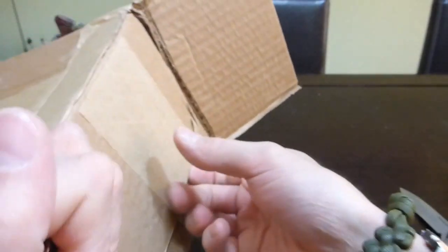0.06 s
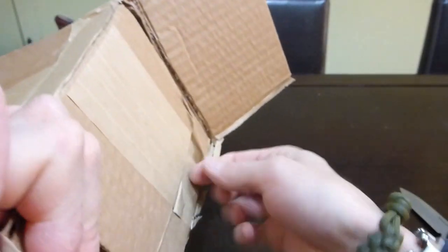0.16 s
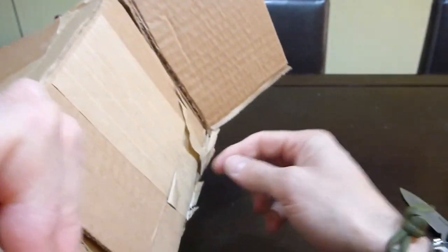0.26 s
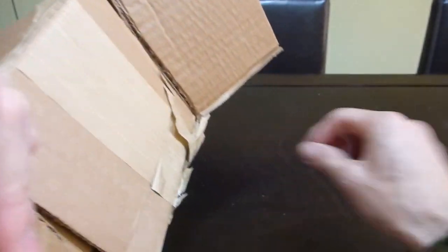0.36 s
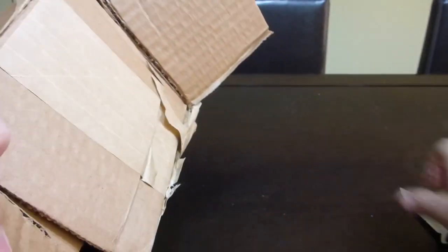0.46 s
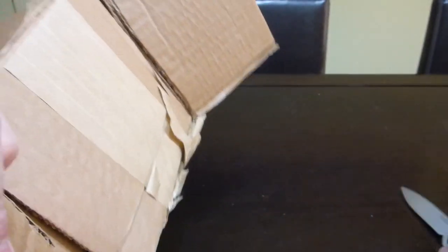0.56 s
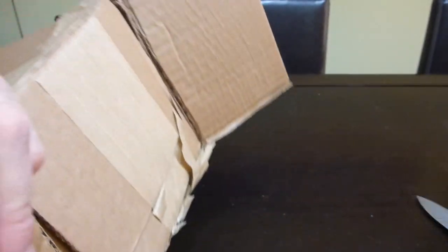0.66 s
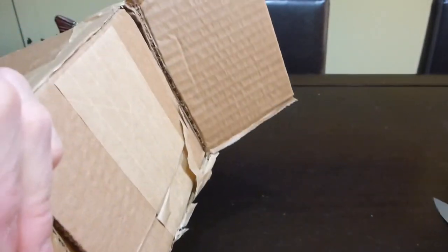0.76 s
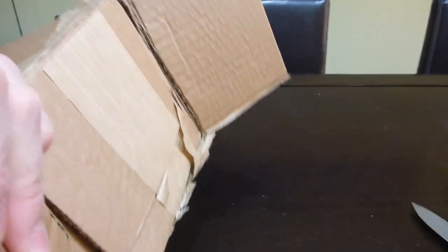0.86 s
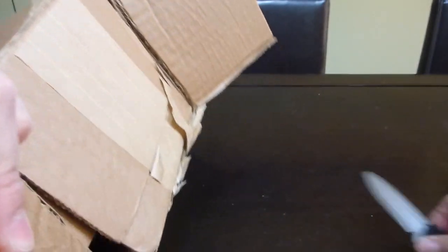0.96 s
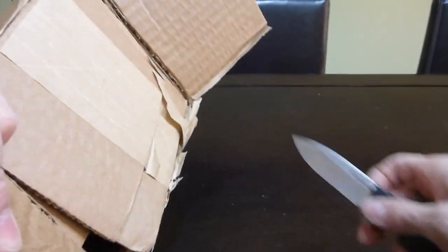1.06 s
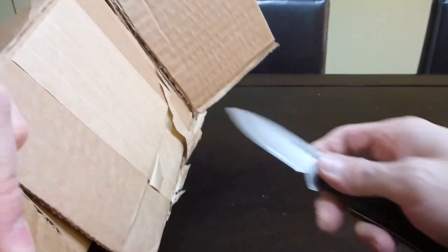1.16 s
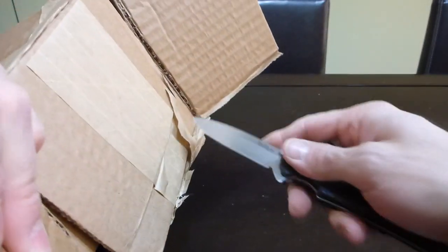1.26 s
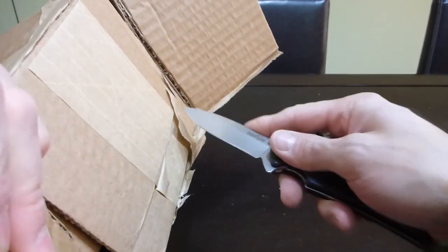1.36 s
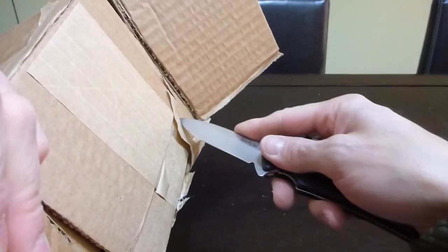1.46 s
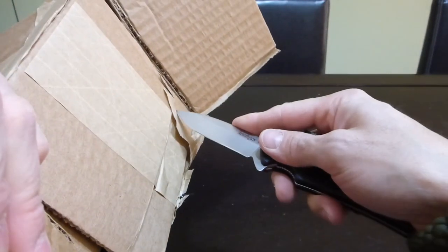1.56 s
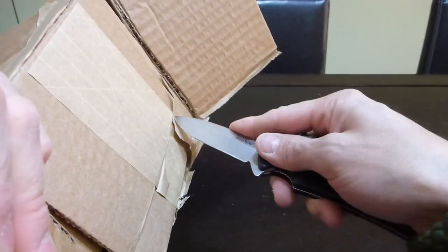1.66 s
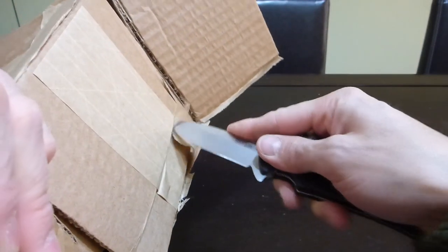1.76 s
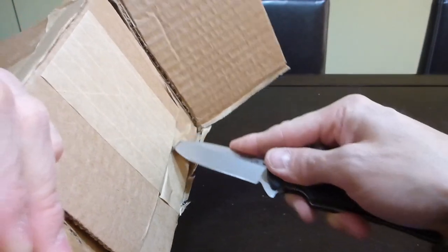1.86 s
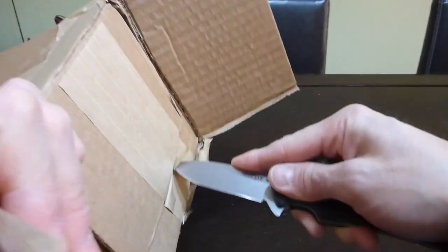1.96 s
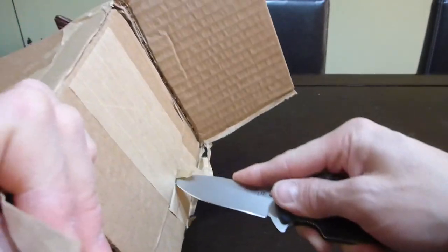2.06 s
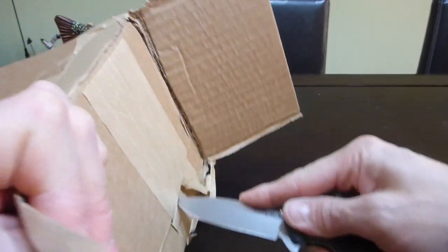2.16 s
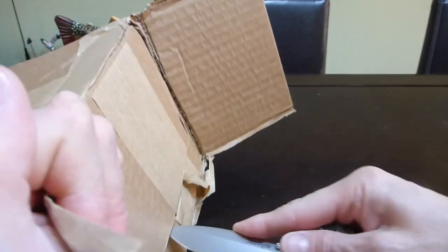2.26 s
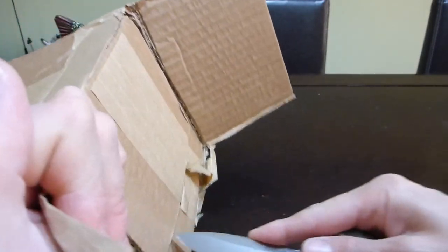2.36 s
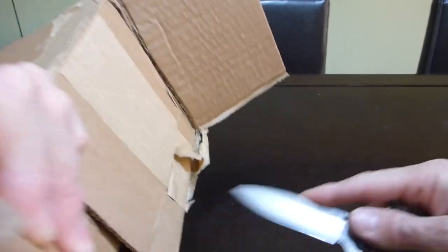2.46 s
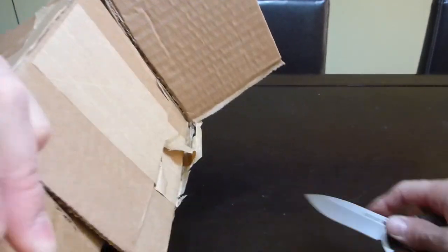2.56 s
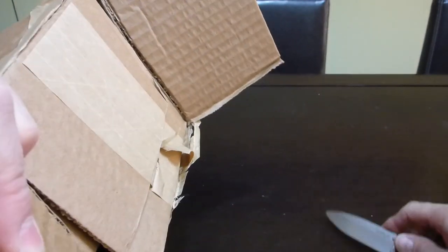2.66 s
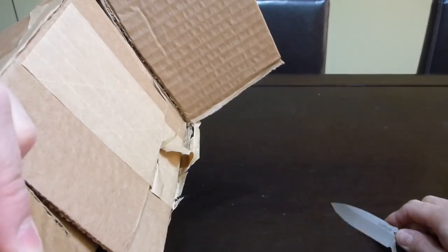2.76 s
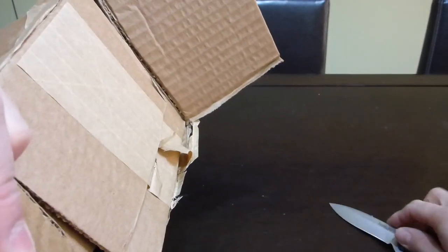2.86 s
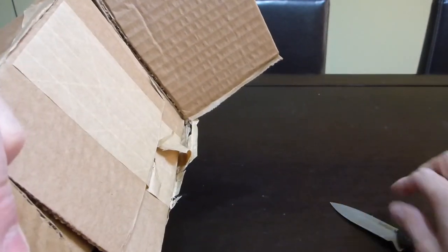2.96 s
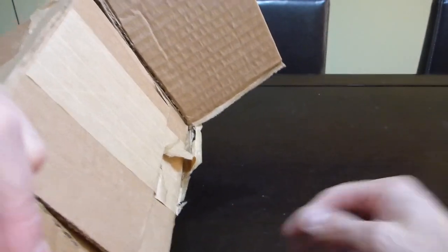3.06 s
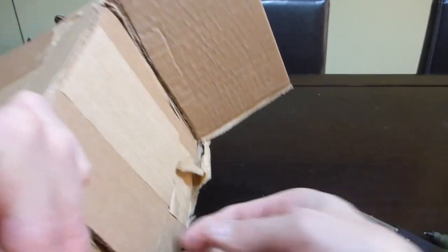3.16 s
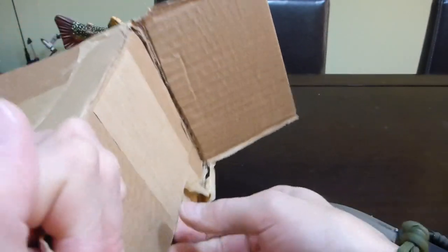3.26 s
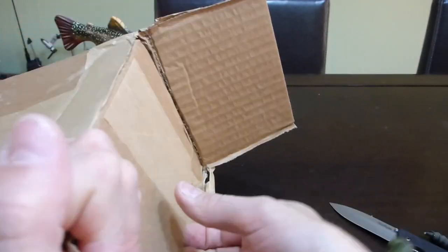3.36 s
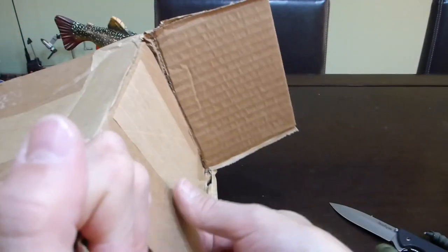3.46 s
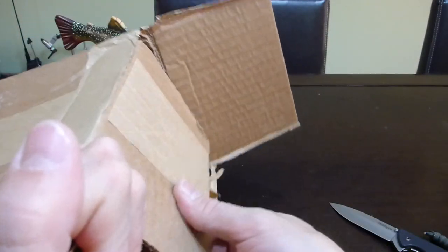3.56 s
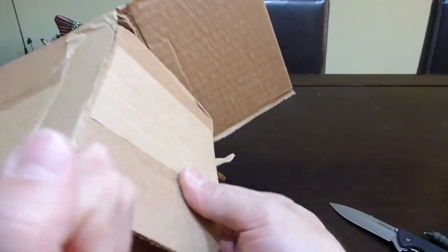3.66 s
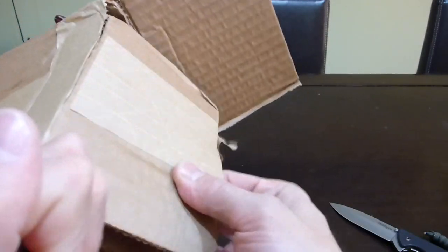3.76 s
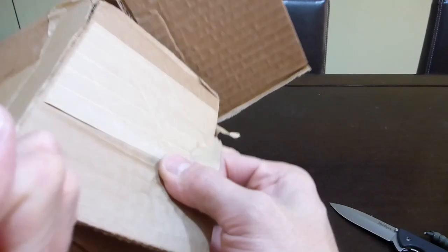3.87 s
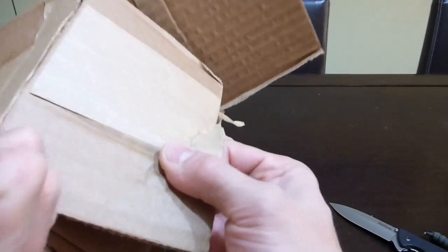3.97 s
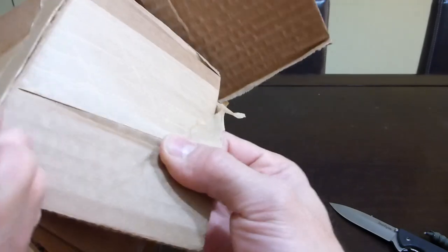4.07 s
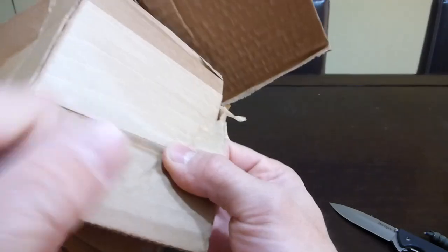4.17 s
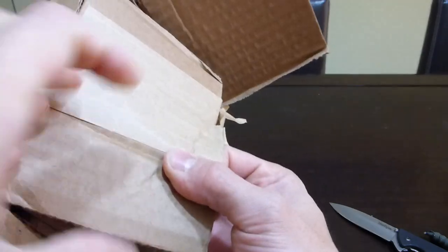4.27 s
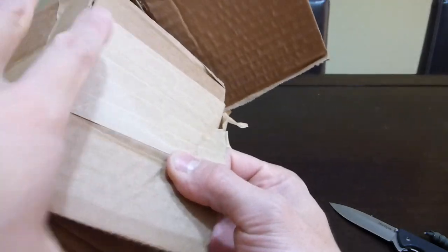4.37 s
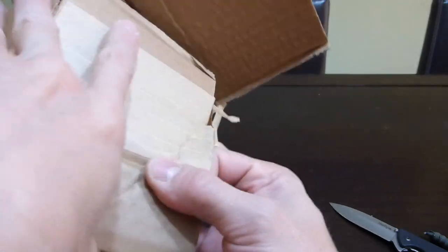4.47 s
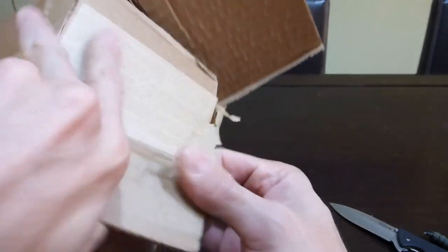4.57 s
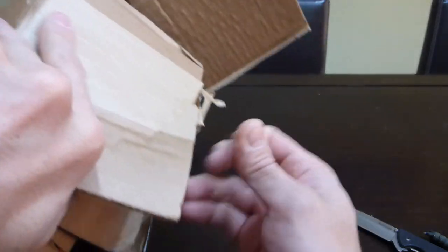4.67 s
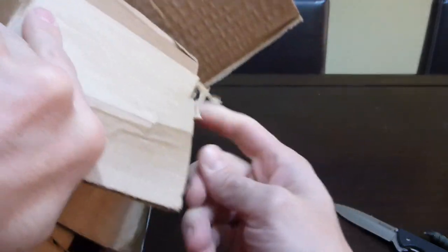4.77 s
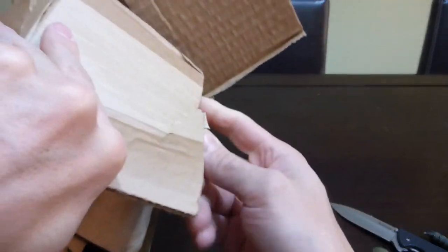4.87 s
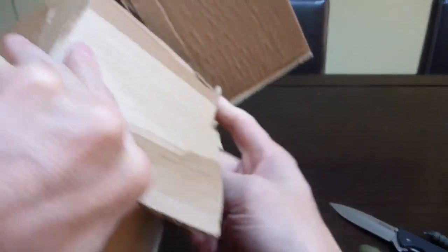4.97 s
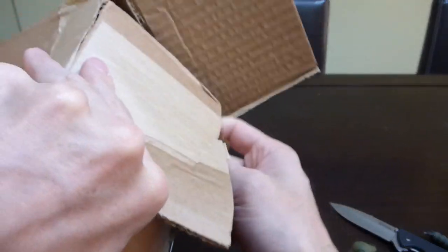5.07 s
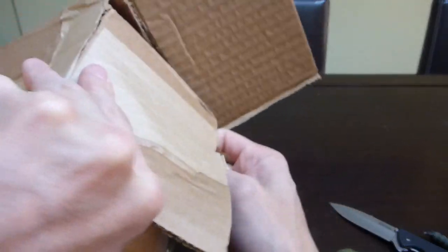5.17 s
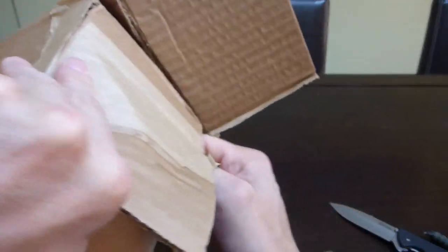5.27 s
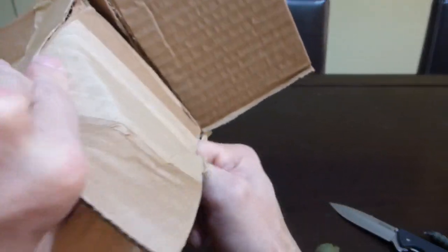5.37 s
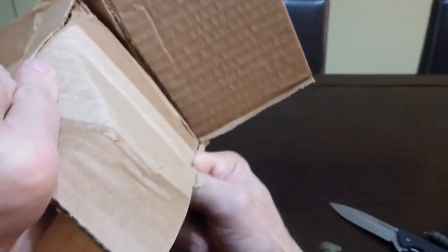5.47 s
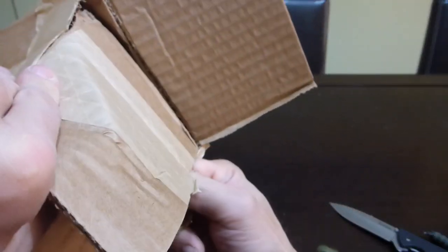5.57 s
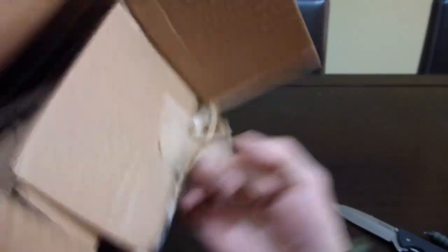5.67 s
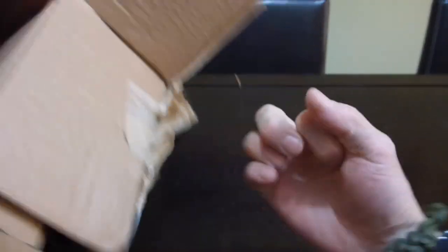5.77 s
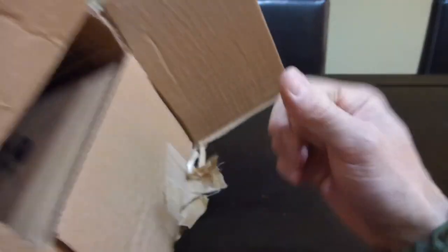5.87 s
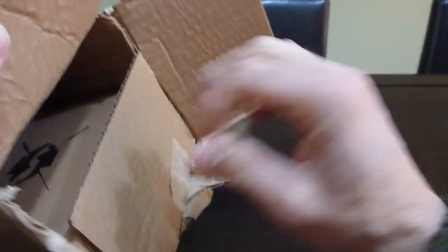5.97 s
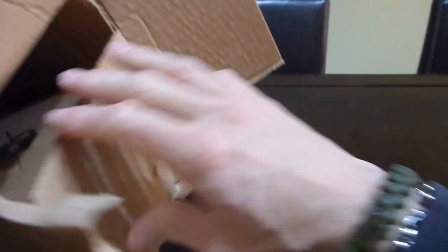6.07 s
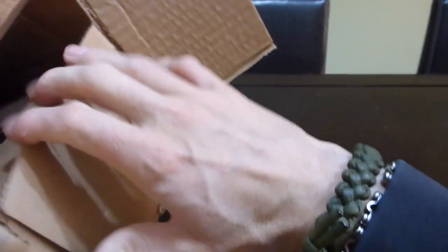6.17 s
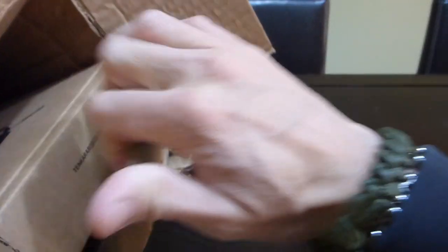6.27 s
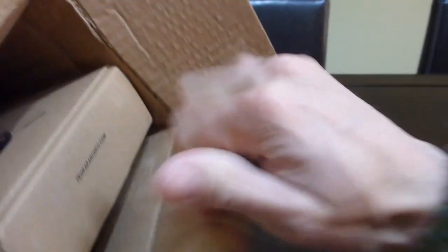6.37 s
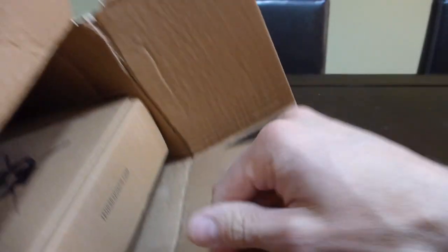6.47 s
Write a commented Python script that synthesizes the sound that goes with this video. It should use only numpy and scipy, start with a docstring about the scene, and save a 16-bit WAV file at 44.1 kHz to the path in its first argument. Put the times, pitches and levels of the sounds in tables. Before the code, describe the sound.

Quiet papery rubbing opens the scene, followed by wooden knocks and small clicks as a knife leaves the table. Tape and card fibres snap briefly, then the knife rattles back down. Hands tug the corrugated flaps, making dry pops, scrapes and hollow bumps; the strongest tearing comes near the end. Close stereo microphone, small room with short reverberation, no speech.

```python
"""Hands and flaps rub and scrape over a taped cardboard box as it is cut and torn open: jerky random clicks
through card filters. Tape and fibres snap: noise bursts and a sharp impulse of force ring the panels; flaps bump.
A knife is picked up from a wooden table and later laid down again: knocks of modal rings, clicks and rattle.
The room is small, with band-wise decaying noise as its reverberation, and is heard in close stereo."""
import sys
import numpy as np
from scipy import signal
from scipy.fft import rfft, irfft
from scipy.io import wavfile
from scipy.ndimage import uniform_filter1d

SR = 44100
rng = np.random.default_rng(int(sys.argv[2]) if len(sys.argv) > 2 else 0)


def waveform_to_disk(signal):
    """Save audio, clipped to [-1, 1], as 16-bit WAV at the path in sys.argv[1]."""
    frames = np.transpose(np.atleast_2d(signal))
    scaled = np.clip(frames, -1, 1) * 32767
    samples = np.round(scaled).astype(np.int16)
    wavfile.write(sys.argv[1], SR, samples)


N = 287796
TIME = np.arange(N) / SR
FREQS = np.fft.rfftfreq(2048, 1 / SR)
SNAP_WINDOW_S, KNOCK_WINDOW_S = 0.008, 0.03  # level references of short and long transients

# tape and card giving way: t/s, panel level/dB, panel pitch f/Hz, crack re panel/dB, rupture t60/s
SNAP_EVENTS = [(0.6246, -35, 930, -8.5, 0.013), (1.687, -50.5, 1210, -3.5, 0.064),
               (2.1479, -33, 1100, 2.5, 0.0095), (2.1776, -35.5, 950, 2, 0.036),
               (2.196, -32.5, 910, -9, 0.047), (2.3272, -34.5, 865, -7, 0.06),
               (2.3577, -24, 1110, -0.5, 0.0066), (2.361, -24.5, 900, -10.5, 0.033),
               (2.3862, -33, 920, -2, 0.022), (3.533, -33, 1370, -5.5, 0.015),
               (3.65, -31, 1170, -1.5, 0.11), (3.7128, -26.5, 1650, -13.5, 0.021),
               (3.7394, -27.5, 890, -19, 0.018), (3.8531, -34, 1310, -6, 0.033),
               (3.9131, -14, 1006, -6, 0.044), (4.1746, -36, 1000, -19, 0.025),
               (4.304, -30, 1100, -8.5, 0.077), (4.4223, -26, 2100, -11, 0.0051),
               (4.4302, -35, 1350, -3.5, 0.032), (4.595, -30.5, 1140, -9.5, 0.1),
               (4.615, -30, 1050, -17, 0.076), (5.2576, -23, 1700, -11, 0.0054),
               (5.268, -40, 1500, 2, 0.013), (5.4, -31, 1360, -6, 0.012),
               (5.4352, -35.5, 1410, -3.5, 0.0068), (5.461, -26.5, 920, -17, 0.018),
               (5.475, -17.5, 1060, -16, 0.004), (5.531, -9, 1056, -11.5, 0.018),
               (5.535, -13.5, 1010, -28, 0.0057), (5.635, -22, 1000, -3.5, 0.0083),
               (5.6423, -21, 1000, -9, 0.0036), (5.719, -38, 1000, -22, 0.0088),
               (5.81, -10, 1008, -12, 0.0038), (5.8642, -25, 1090, -17, .006),
               (5.906, -22.5, 1450, -13.5, 0.016), (6.052, -25.5, 1180, -22, 0.015),
               (6.356, -32.5, 1480, -19, 0.022), (6.413, -36.5, 1260, -29, 0.018),
               (6.494, -33.5, 1690, -6.5, 0.022)]
# colour of corrugated card: f/Hz, density/dB per Hz
CARD_COLOUR = [(59, -26.5), (110, -13.5), (190, -10), (260, -2.5), (420, 2.5), (600, 0.5), (950, 6.5),
               (1350, 2.5), (1850, -2), (2350, -13.5), (3700, -18.5), (4900, -16.5), (7000, -25.5),
               (10000, -32), (15500, -38)]
# diffuse sound between the microphones: f/Hz, side re mid/dB
SIDE_WIDTH = [(100, -26.5), (350, -15.5), (1200, -9), (2400, 2), (5000, 2.5)]


def undb(db):
    """Decibels to gain."""
    return 10 ** (np.asarray(db) / 20)


def unit(x):
    """Scale to rms 1."""
    return x / np.sqrt(np.mean(x ** 2))


def packed(x, window_s):
    """Scale a transient so that its energy equals rms 1 over the window."""
    return x * np.sqrt(window_s * SR / np.sum(x ** 2))


def read(table, hz, axis=1):
    """One column of a frequency table, interpolated linearly over log frequency."""
    table = np.array(table)
    return np.interp(np.log(hz + 1), np.log(table[:, 0]), table[:, axis])


def colour(x, spectrum):
    """Causal minimum-phase filter with the given spectrum, built by folding its cepstrum."""
    cepstrum = irfft(np.log(undb(read(spectrum, FREQS))))
    half = len(cepstrum) // 2
    cepstrum[1:half] *= 2
    cepstrum[half + 1:] = 0
    response = irfft(np.exp(rfft(cepstrum)))[:half]
    return signal.fftconvolve(x, response)[:len(x)]


def band(x, hz, kind="bandpass", order=3):
    """Butterworth filter."""
    sos = signal.butter(order, np.minimum(hz, SR / 2 - 1), kind, fs=SR, output="sos")
    return signal.sosfilt(sos, x)


def add(track, s, sound):
    """Mix a sound into the track at time s."""
    start = max(int(s * SR), 0)
    track[start:start + len(sound)] += sound[:N - start]


def walk(rate_hz):
    """Slow chance: random levels of either sign joined by ramps, rms 1."""
    hold = max(int(SR / rate_hz), 1)
    levels = np.repeat(rng.standard_normal(N // hold + 1), hold)
    return unit(uniform_filter1d(levels, hold)[:N])


def grains(rate_hz, spread_db):
    """Fibres catching and slipping: random clicks, a few of them much larger than the rest."""
    hit = rng.random(N) < rate_hz / SR
    size = undb(spread_db * np.minimum(rng.exponential(size=N), 2 * np.pi))
    return hit * size * rng.choice([-1, 1], N)


def card(force, wall_hz=600, paper_hz=2400):
    """What card radiates when pushed: wall boom, panel scrape and paper hiss."""
    sound = colour(force, CARD_COLOUR)
    wall = band(sound, wall_hz, "lowpass")
    panel = band(sound, [wall_hz, paper_hz], order=4)
    paper = band(sound, paper_hz, "highpass", order=4)
    return wall, panel, paper


def rubbing(catch_rate_hz=350, catch_db=3.5, fibre_rate_hz=3000, fibre_db=0.5, fibre_share=1.0,
            tick_rate_hz=45, tick_share=0.5, jerk_rate_hz=75, jerk_db=3.6,
            sheen_hz=7000, sheen_drift_db=2.5, sheen_drift_hz=23):
    """Card slides in small jerks: coarse catches drive the panels, fine fibres hiss, and loose ends tick."""
    jerks = undb(jerk_db * walk(jerk_rate_hz))
    catches = unit(grains(catch_rate_hz, catch_db))
    fibres = unit(grains(fibre_rate_hz, fibre_db))
    ticks = unit(grains(tick_rate_hz, 2.5))
    # a tick is about a millisecond of fibres parting, each with its own noise
    ticks = unit(uniform_filter1d(ticks, size=60) * rng.standard_normal(N))
    wall, panel, _ = card(jerks * (catches + fibre_share * fibres))
    _, _, paper = card(jerks ** 0.75 * (fibres + tick_share * ticks))
    # the finest hiss comes and goes as the fingers roll on the paper
    sheen = band(paper, sheen_hz, "highpass") * undb(sheen_drift_db * walk(sheen_drift_hz))
    parts = wall, panel, band(paper, sheen_hz, "lowpass"), sheen
    return sum(unit(part) * gain for part, gain in zip(parts, stroke_levels()))


def stroke_levels(boom_db=-1, hiss_db=-8.5, sheen_db=-14.5, boom_per_bright=0.28, sheen_per_bright=1.3,
                  release_s=0.01, release_per_swell=0.2, strain_db=-9.5, strain_s=0.0036, debris_s=0.016):
    """Gains of wall, panel, paper, sheen: strokes gather speed and die away; fibres crackle around snaps."""
    # hands and flaps dragging: start t/s, length/s, panel level/dB,
    # brightness/dB (plus skims the paper, minus presses the wall), time to full speed/s
    strokes = [(0, 0.079, -52.5, 1.5, 0.0064), (.08, 0.27, -50.5, 7.5, 0.032), (.4, 0.3, -62.5, 3.5, 0.085),
               (1.02, 0.26, -66.5, 9, 0.045), (1.5, .36, -60, -10, 0.22), (1.885, 0.33, -48.5, 0.5, 0.033),
               (2.379, 0.019, -26.5, -7.5, 0.005), (2.41, 0.11, -51.5, 0, .015),
               (2.56, .77, -66.5, -4, 0.072), (3.35, .5, -52, 2.5, 0.021), (3.713, 0.11, -30, 0.5, 0.019),
               (3.82, .13, -37, 0.5, .02), (3.93, 0.41, -43, -1, .03), (4.3, 0.34, -51, 4, 0.019),
               (4.47, 0.41, -53, -1, 0.051), (4.554, 0.047, -40, 4, 0.024), (4.689, .11, -41, 2, .11),
               (4.868, 0.048, -40, -9.5, 0.0072), (4.92, 0.36, -53, 2.5, 0.023),
               (5.088, 0.24, -49.5, 6, 0.033), (5.221, 0.024, -35, 4.5, 0.012), (5.32, 0.1, -43, 6, 0.063),
               (5.535, 0.077, -30.5, -4.5, 0.0088), (5.63, 0.18, -49.5, 5, 0.018),
               (5.809, 0.079, -24.5, -5.5, 0.022), (5.899, 0.23, -37, -7.5, 0.026),
               (6.13, 0.19, -49, -6, .02), (6.344, 0.28, -45.5, 2.5, 0.016)]
    power = np.zeros((4, N))
    for start, length, db, bright_db, swell_s in strokes:
        t = np.maximum(TIME - start, 0)
        # a stroke that starts gently also ends gently
        fall_s = release_s + release_per_swell * swell_s
        grip = np.minimum(t / swell_s, 1) * np.exp(-np.maximum(t - length, 0) / fall_s)
        tone_db = [boom_db - boom_per_bright * bright_db, 0,
                   hiss_db + bright_db, sheen_db + sheen_per_bright * bright_db]
        power += np.outer(undb(tone_db), grip * undb(db)) ** 2
    for s, db, _, crack_db, _ in SNAP_EVENTS:
        # crackle grows up to the snap and trails off after it
        strain = np.exp(np.minimum((TIME - s) / strain_s, (s - TIME) / debris_s))
        tone_db = [0, crack_db, crack_db + sheen_db - hiss_db]
        power[1:] += np.outer(undb(tone_db), strain * undb(db + strain_db)) ** 2
    return np.sqrt(power)


def snaps(panel_q=2.16, panel_top_ratio=1.456, followers=0.99, fibre_rate_hz=7000, rise_s=0.0007,
          crack_top_hz=10000, thump_db=4, thump_per_crack=0.91, thump_db_per_octave=-9, panel_hz=1000):
    """A run of fibres breaks or is crushed within milliseconds; the panel swings for a few cycles."""
    track, t = np.zeros(N), TIME[:SR // 10]
    for s, db, hz, paper_db, rupture_s in SNAP_EVENTS:
        # a cleaner break jolts the wall harder; a small, high-pitched panel moves it less
        wall_db = thump_db + thump_per_crack * paper_db + thump_db_per_octave * np.log2(hz / panel_hz)
        fibres = rng.standard_normal(len(t)) * (rng.random(len(t)) < fibre_rate_hz / SR)
        tearing = fibres * (1 - np.exp(-t / rise_s)) * undb(-60 * t / rupture_s)
        impulse = np.arange(len(t)) == int(rise_s * SR)  # the panel lets go at once
        force = followers * tearing + impulse
        wall, _, paper = card(force)
        paper = band(paper, crack_top_hz, "lowpass", order=1)
        panel = signal.lfilter(*signal.iirpeak(hz, panel_q, fs=SR), force)
        panel = band(panel, panel_top_ratio * hz, "lowpass", order=4)
        parts = (panel, 0), (wall, wall_db), (paper, paper_db)
        add(track, s, sum(packed(part, SNAP_WINDOW_S) * undb(db + part_db) for part, part_db in parts))
    return track


def tape_ticks(lo_hz=3800, hi_hz=11000, rise_s=0.00054, t60_s=0.0052):
    """A loose edge of tape flicks free: a thin, crisp tick too light to move the panel."""
    tick_events = [(0.08, -54), (0.281, -58), (1.255, -56), (4.483, -49), (4.7763, -46), (5.475, -35),
                   (6.0265, -53)]  # loose tape edges: t/s, level/dB
    track, t = np.zeros(N), TIME[:SR // 10]
    for s, db in tick_events:
        flick = rng.standard_normal(len(t)) * (1 - np.exp(-t / rise_s)) * undb(-60 * t / t60_s)
        add(track, s, undb(db) * packed(band(flick, [lo_hz, hi_hz], order=2), SNAP_WINDOW_S))
    return track


def bumps(wall_hz=380, push_s=0.00073, wall_t60_s=0.039, scuff_db=-2, scuff_rise_s=0.0051, scuff_hz=600,
          flex_db=-11, flex_hz=200):
    """A soft push sets the box wall booming, while skin or card scuffs briefly over it."""
    bump_events = [(0.001, -39.5), (0.1485, -35), (0.3686, -37.5), (1.631, -47), (2.819, -47),
                   (4.485, -30.5), (4.777, -32.5), (4.803, -32.5), (5.181, -34), (5.863, -33), (5.876, -20),
                   (6.2765, -27), (6.493, -40)]  # hands and flaps against the box wall: t/s, boom level/dB
    track, t = np.zeros(N), TIME[:SR // 5]
    fade = undb(-60 * t / wall_t60_s)
    swing = (1 - np.exp(-t / push_s)) * fade
    for s, db in bump_events:
        boom = np.sin(2 * np.pi * wall_hz * rng.uniform(0.92, 1.08) * t) * swing
        flex = band(rng.standard_normal(len(t)) * swing, [flex_hz / 2, flex_hz], order=2)
        drag = rng.standard_normal(len(t)) * (1 - np.exp(-t / scuff_rise_s)) * fade
        scuff = band(colour(drag, CARD_COLOUR), scuff_hz, "highpass", order=2)
        parts = (boom, 0), (flex, flex_db), (scuff, scuff_db)
        add(track, s, sum(packed(part, SNAP_WINDOW_S) * undb(db + part_db) for part, part_db in parts))
    return track


def knocks(node_fill=0.98, shudder_db=-19, shudder_hz=150, dense_db=-10, dense_t60_s=0.23,
           click_t60_s=0.031, click_gain_db=6, rattle_db=-6.98, rattle_t60_s=0.061, rattle_top_hz=2800,
           ring_db=-1, ring_t60_400hz_s=0.1, damping=0.68, contact_q=0.63, lowest_hz=100):
    """The knife clicks and rattles on the table top, whose brief modal rings sound over a longer dense thud."""
    # knife against table: t/s, level/dB, contact hardness f/Hz, click/dB before click_gain_db
    knock_events = [(0.7374, -16.5, 1170, -20.5), (0.7475, -19, 494, -30), (0.76, -27.5, 560, -22),
                    (0.8155, -32, 280, -41), (0.8269, -27, 950, -13.5), (0.8623, -23.5, 1090, -22),
                    (0.8705, -26.5, 500, -37), (0.931, -34.5, 695, -22.5), (1.009, -37, 500, -24),
                    (1.1867, -47.5, 441, -31), (2.8642, -23.5, 1420, -9), (2.968, -29.5, 750, -26),
                    (2.9984, -18.5, 630, -20), (3.0084, -21, 620, -25), (3.017, -23, 646, -33),
                    (3.028, -24.5, 1000, -29), (3.062, -31, 920, -24), (3.123, -50, 900, 5),
                    (3.155, -38, 694, -35), (3.172, -34.5, 690, -40), (3.34, -41, 570, -16)]
    # modes of the table top: f/Hz, level/dB
    table_modes = [(135, -17), (255, -6.5), (339, -5), (382, -4), (486, -4), (632, -5.5), (686, -3.5),
                   (855, -4), (1055, -3), (1365, -4), (1690, -5.5), (1950, -4), (2650, -5.5)]
    # colour of the contact click: f/Hz, density/dB per Hz
    click_colour = [(900, -48), (2200, 1), (3200, -6.5), (5000, -9.5), (7000, -13), (10000, -24),
                    (15000, -41)]
    track, t = np.zeros(N), TIME[:SR // 2]
    hz, mode_db = np.transpose(table_modes)
    t60_s = ring_t60_400hz_s * (400 / hz) ** damping  # wood damps its higher modes faster

    def burst(level_db, decay_t60_s):
        """Noise with an exponential decay."""
        return rng.standard_normal(len(t)) * undb(level_db - 60 * t / decay_t60_s)

    for s, db, hard_hz, click_db in knock_events:
        # a mode answers weakly near its nodes, and most where the contact time suits its period
        shape = np.sin(np.pi * rng.random(len(hz))) ** 2 + node_fill
        focus = contact_q * hard_hz / 700  # taps centred higher excite a narrower band of modes
        contact = 1 / np.sqrt(1 + (focus * (hz / hard_hz - hard_hz / hz)) ** 2)
        # the weight of hand and knife shifts the modes a little at each blow
        loaded_hz = hz * (1 + 0.007 * rng.standard_normal(len(hz)))
        rings = np.sin(2 * np.pi * loaded_hz[:, None] * t) * undb(-60 * t / t60_s[:, None])
        ring = (rng.choice([-1, 1], len(hz)) * undb(mode_db) * shape * contact) @ rings
        ring = band(ring, lowest_hz, "highpass")  # the ring keeps nothing below lowest_hz
        thud = band(burst(0, dense_t60_s), [hard_hz * 0.41, hard_hz * 1.79])
        click = colour(burst(0, click_t60_s), click_colour)
        rattle = colour(burst(rattle_db, rattle_t60_s), click_colour)
        click = click + band(rattle, rattle_top_hz, "lowpass")
        shudder = band(burst(0, dense_t60_s), [shudder_hz / 2, shudder_hz], order=2)
        parts = (ring, ring_db), (thud, dense_db), (shudder, shudder_db)
        body = sum(packed(part, KNOCK_WINDOW_S) * undb(part_db) for part, part_db in parts)
        body = body + knife_ring(t, hard_hz)
        click = undb(click_db + click_gain_db) * packed(click, SNAP_WINDOW_S)
        add(track, s, undb(db) * (body + click))
    return track


def knife_ring(t, hard_hz, level_db=7, t60_s=0.087, contact_hz=1407, steepness=11):
    """Blade and handle ring briefly; contacts much softer than contact_hz barely set them going."""
    knife_modes = [(856, -3.5), (1400, -4), (1534, 1.5), (1650, -1.5)]  # blade and handle: f/Hz, level/dB
    ring = sum(undb(db) * np.sin(2 * np.pi * hz * t) for hz, db in knife_modes)
    ring = packed(ring * undb(-60 * t / t60_s), KNOCK_WINDOW_S)
    return ring / (1 + (contact_hz / hard_hz) ** steepness) * undb(level_db)


def microphones(x, lag_s, scatter_db=-4, scatter_rate_hz=700, scatter_hz=2200, steady_hz=4500):
    """Two ports: bass reaches the left lag_s later, the left treble is duller, and treble scatters sideways."""
    # direct sound at the two ports: f/Hz, left re right/dB
    ports = [(100, 1), (1300, 1), (2400, 1.5), (4500, -7), (14000, -2.5)]
    side = band(x * walk(scatter_rate_hz), scatter_hz, "highpass", order=2) * undb(scatter_db)
    hz = np.fft.rfftfreq(N, 1 / SR)
    phase = np.pi * lag_s * steady_hz * np.tanh(hz / steady_hz)  # only long waves keep a steady lag
    left = undb(read(ports, hz) / 2) * np.exp(-1j * phase)
    return np.array([irfft(rfft(x + side) * left, N), irfft(rfft(x - side) / left, N)])


def room(x, gap_s=0.00028, build_s=0.0038):
    """Reflections from box, table and walls: decaying noise per band, its bass nearly alike in both ears."""
    # the room: f/Hz, t60/s, reverberation re input/dB
    room_bands = [(120, 0.5, -7), (344, 0.46, -1.5), (1000, 0.49, -7), (2160, 0.44, -8), (4830, 0.34, -9),
                  (12600, 0.65, -12)]
    t = TIME[:SR]
    onset = 1 - np.exp(-np.maximum(t - gap_s, 0) / build_s)
    edges_hz = np.geomspace(40, 16000, 15)
    response = np.zeros((2, SR))
    for lo, hi in zip(edges_hz, edges_hz[1:]):
        hz = np.sqrt(lo * hi)
        fade = onset * undb(-60 * t / read(room_bands, hz))
        # energy in proportion to bandwidth
        mid, side = (packed(band(rng.standard_normal(SR), [lo, hi]) * fade, 2 * (hi - lo) / SR ** 2)
                     for _ in range(2))
        side = undb(read(SIDE_WIDTH, hz)) * np.array([side, -side])
        response += undb(read(room_bands, hz, axis=2)) * (mid + side)
    return signal.fftconvolve(x[None], response, axes=1)[:, :N]


def air(level_db=-72.5):
    """Faint steady room noise: coloured noise, independent in mid and side."""
    air_colour = [(30, -5), (100, -16), (330, -3), (900, -7), (3000, -9), (15000, -22.5)]  # still room air: f/Hz, relative density/dB per Hz
    mid, side = (unit(colour(rng.standard_normal(N), air_colour)) for _ in range(2))
    side = colour(side, SIDE_WIDTH)
    return undb(level_db) * (mid + np.array([side, -side]))


def scene(rub_room_db=-1, snap_room_db=0, knock_room_db=-3):
    """Box and knife close by, with the room around them."""
    rub = rubbing()
    snap = snaps() + bumps() + tape_ticks()
    knock = knocks()
    box = undb(rub_room_db) * rub + undb(snap_room_db) * snap
    turn = np.pi / 2 * walk(2)  # the reflections change as the box is turned
    wet = room(box * np.cos(turn)) + room(box * np.sin(turn)) + room(undb(knock_room_db) * knock)
    direct = microphones(rub + snap, lag_s=4.5e-5) + microphones(knock, lag_s=-9.1e-5)
    return direct + wet + air()


def record(dry, top_hz=15600):
    """Clip at full scale, then cut the treble above top_hz steeply."""
    sos = signal.ellip(8, 0.2, 70, top_hz, fs=SR, output="sos")
    return signal.sosfilt(sos, np.clip(dry, -1, 1))


dry = scene()
out = record(dry)
waveform_to_disk(out)
```